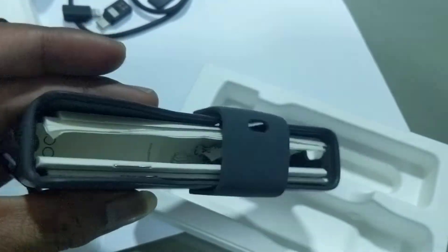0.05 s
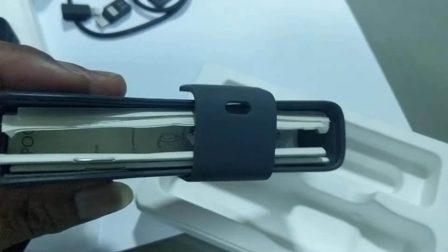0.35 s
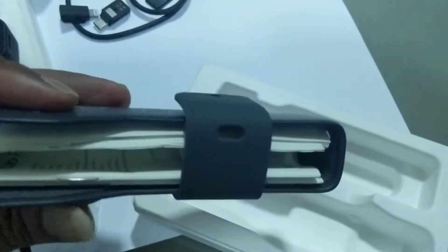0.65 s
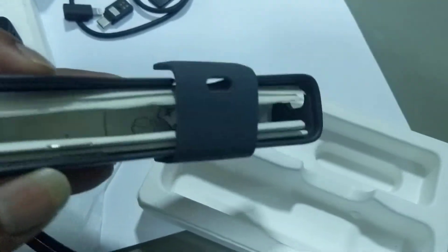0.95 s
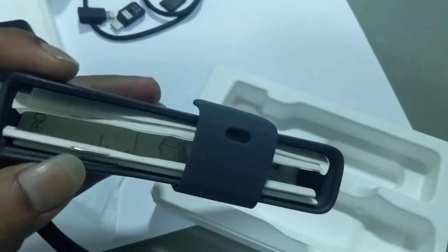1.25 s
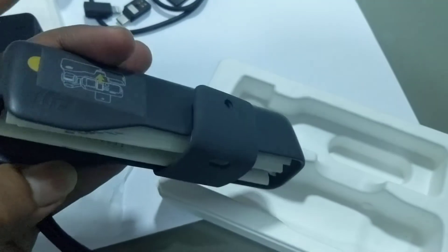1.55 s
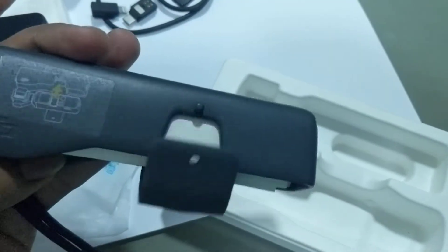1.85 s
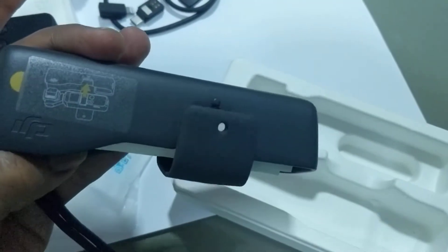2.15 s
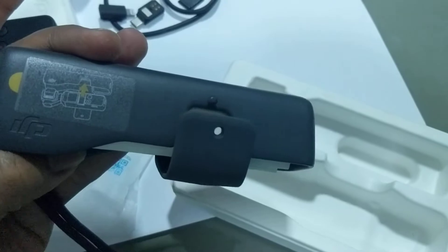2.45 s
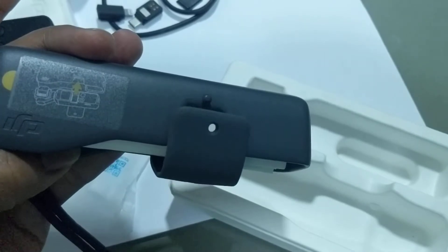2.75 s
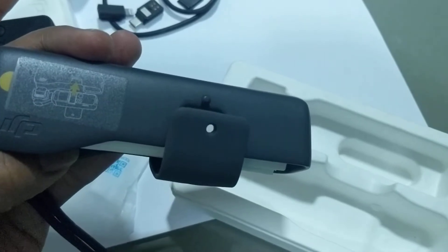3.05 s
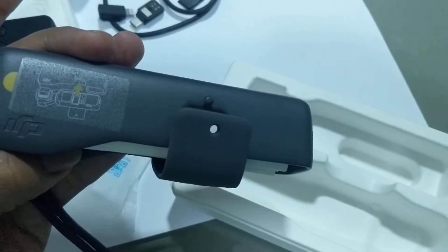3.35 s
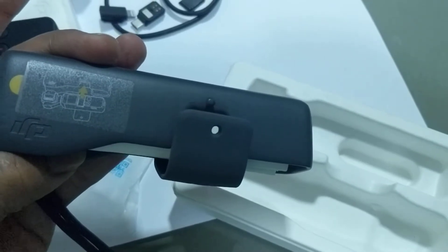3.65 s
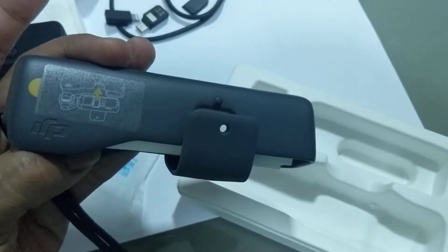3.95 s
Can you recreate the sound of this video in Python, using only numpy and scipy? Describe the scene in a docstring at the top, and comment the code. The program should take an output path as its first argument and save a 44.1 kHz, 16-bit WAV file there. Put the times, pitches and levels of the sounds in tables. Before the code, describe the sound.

One sharp knock on a hard plastic case comes right at the start, close by. Fingers slide faintly over the shell from about 0.3 seconds. Between 0.9 and 2.2 seconds the clasp ticks lightly and irregularly among short scrapes, clearest at 1 second. An electric fan hums with a soft rush of air throughout the small, quiet room, alone until one last tick at 3.9 seconds.

```python
"""A small, quiet room, where a hard plastic case is handled close by.
One sharp knock rings its shell. Fingers then slide over it as it is turned, their tiny slips
exciting the plastic, and the clasp ticks and scrapes open; one last tick comes near the end.
Behind it an electric fan hums on the mains, with wavering tones and a soft rush of air."""
import sys
import numpy as np
from scipy import signal
from scipy.fft import rfft, irfft
from scipy.io import wavfile

SR = 44100
rng = np.random.default_rng(int(sys.argv[2]) if len(sys.argv) > 2 else 0)


def digitize_waveform(pressure):
    """Quantize a signal to 16-bit integers and store it at the path in sys.argv[1].

    Rows of a 2-D input are taken as channels; values are limited to [-1, 1].
    """
    field = np.atleast_2d(pressure).T
    bounded = np.clip(field, -1, 1)
    quanta = np.round(bounded * 32767).astype(np.int16)
    wavfile.write(sys.argv[1], SR, quanta)


N = 176400
T = np.arange(N) / SR
BINS = np.arange(N // 2 + 1) * SR / N  # Hz


def amp(db):
    """Decibels to gain."""
    return 10 ** (np.asarray(db) / 20)


def unit(x):
    """Scale to an rms of one."""
    return x / np.sqrt(np.mean(x ** 2))


def curve(points, hz):
    """Read (Hz, value) points on a log-frequency axis."""
    freqs, values = np.array(points).T
    return np.interp(np.log(hz + 1e-9), np.log(freqs), values)


def shape(x, gain):
    """Filter by a gain for each frequency."""
    return irfft(rfft(x) * gain, N)


def resonance(hz, width_hz):
    """Response of one resonance, gain one at its centre."""
    return 1j * BINS * width_hz / (hz ** 2 - BINS ** 2 + 1j * BINS * width_hz)


def ripple(spacing_hz):
    """Random peaks and dips over frequency from many overlapping resonances; spread near one."""
    steps = np.arange(2 ** 11)
    return np.interp(BINS, spacing_hz * steps, rng.standard_normal(len(steps)))


def walk(rate_hz):
    """Smooth random motion with a spread of one."""
    return unit(shape(rng.standard_normal(N), np.exp(-(BINS / rate_hz) ** 2)))


def fade(t, t60):
    """Exponential decay, 60 dB down after t60 seconds."""
    return np.exp(-np.log(1000) * t / t60)


def add(out, start_s, x):
    """Mix a short sound in at its time."""
    i = max(int(start_s * SR), 0)
    out[i:i + len(x)] += x[:max(N - i, 0)]


def room(x):
    """Diffuse reflections: the mids die first, while the bass and the very top linger."""
    # decay of the room: frequency_hz, t60_s
    decay = [(200, 1.4), (1000, 0.33), (2000, 0.55), (5000, 0.55), (12000, 1.45)]
    # colour of the reflections: frequency_hz, gain_db
    colour = [(200, -36), (600, 13), (1100, 5.5), (1700, 7), (2600, 5.5), (5000, 8), (12000, 4)]
    tail, noise = np.zeros(N), rng.standard_normal(N)
    octave = np.log2(np.clip(BINS, 2 ** 7, 2 ** 14))
    for k in range(7, 15):
        band = shape(noise, np.maximum(1 - abs(octave - k), 0))
        tail += band * fade(T, curve(decay, 2 ** k))
    tail *= T > .005  # pre-delay, s
    tail = shape(tail / np.linalg.norm(tail), amp(curve(colour, BINS)))
    return signal.fftconvolve(x, tail[:SR])[:N]


def fan():
    """The motor hums on the mains, among wavering tones and a soft rush of air."""
    # motor hum: harmonic_number, level_db
    harmonics = [(1, -36), (2, -44.5), (3, -46), (4, -59.5), (5, -63.5)]
    # wavering tones, each noise sent twice through a resonance: pitch_hz, level_db, half_width_hz
    bands = [(59, -53.5, 4.3), (142.9, -52.5, 6.6), (221.6, -58, 1.7), (260.6, -49.5, 2.85),
             (346.4, -65, 6), (351.4, -59, 3.7), (431.5, -68, 15), (482, -65.5, 19), (535, -67, 4.6),
             (653, -71.5, 20), (760, -68, 4.2), (802, -65, 9.9), (869.6, -62, 15.5), (921.6, -65.5, 13),
             (1690, -74.5, 270)]
    # rush of air and hiss: frequency_hz, density_db (power in a 1 Hz band)
    air_spectrum = [(20, -98), (35, -72), (55, -79), (120, -68), (190, -71.5), (300, -74), (420, -77.5),
                    (600, -84.5), (850, -86.5), (1100, -85), (1400, -94), (1800, -95.5), (2500, -100),
                    (3100, -100), (3500, -102), (3900, -100), (4700, -102), (5250, -99), (6000, -103),
                    (7600, -104), (8900, -110), (12000, -112), (16000, -113)]
    hum_hz, waver_db, ripple_db, flicker_db = 100.1, -0.15, 2.5, 0.7
    phase = 2 * np.pi * hum_hz * T + 0.012 * walk(3.1)
    hum = np.zeros(N)
    for harmonic, db in harmonics:
        peak = np.sqrt(2) * amp(db + waver_db * walk(1.5))
        hum += peak * np.sin(harmonic * phase + 2 * np.pi * rng.random())
    tones = sum(amp(db) * unit(shape(rng.standard_normal(N), resonance(hz, 2 * half_width) ** 2))
                for hz, db, half_width in bands)
    noise = rng.standard_normal(N) * np.sqrt(SR / 2)  # unit power per Hz
    air = shape(noise, amp(curve(air_spectrum, BINS) + ripple_db * ripple(spacing_hz=29.8)))
    return hum + tones + air * amp(flicker_db * walk(2))


def slides():
    """Tiny slips under an uneven grip excite the plastic; two rings stand out at each spot rubbed."""
    # skin and clasp sliding over the shell: start_s, rise_s, hold_s, release_s, level_db,
    # hold_change_db, low_ring_hz, low_ring_db, high_ring_hz, high_ring_db, tilt_db_per_octave
    strokes = [(.008, 0.001, 0.043, 0.024, -39, -7, 2820, -4, 4820, -7, -1.3),
               (0.334, .007, .003, 0.011, -55.5, -2, 7600, -3, 9000, -10, 3),
               (0.32, 0.16, 0.076, 0.33, -57.5, -8, 5100, -25, 7000, -16, 1),
               (0.687, .05, 0.029, 0.05, -65.5, 1, 5430, -17, 7400, -19, 3),
               (0.884, .03, 0.018, .05, -57.5, -7, 1890, -1, 2500, -8, -5),
               (1.048, 0.016, 0.041, 0.0068, -47.5, 0.5, 1160, -7, 5400, -8.5, -0.7),
               (1.139, .004, 0.1, 0.1, -44, -14, 840, -11, 4560, -4, -2.3),
               (1.335, .012, .01, 0.05, -56.5, -3, 7860, -16, 11500, -14, 3),
               (1.448, 0.025, 0.1, .014, -47.5, -1, 3100, -1.5, 7160, -16, -1.5),
               (1.707, 0.0075, 0.065, 0.028, -52.5, -4, 1790, -5, 6770, -6.5, -0.5),
               (1.796, 0.043, 0.02, 0.073, -48, -2.5, 1930, -4, 4250, -10, -0.2)]
    # colour of the rubbing before each stroke's tilt: frequency_hz, gain_db
    colour = [(300, 6), (800, -5.5), (1300, -1.5), (2000, 2), (3700, -4), (5600, -4.5), (6800, -3.5),
              (8300, -2.5), (10000, -9), (11500, -13), (16000, -17)]
    slips_per_s, slip_spread_db, skin_hiss_db = 2200, 2, -7.5
    ring_width_hz, grip_db = 280, 0.5
    octaves = np.log2(np.maximum(BINS, 800))  # the tilt acts above 800 Hz
    out = np.zeros(N)
    for start, rise, hold, release, db, change_db, low_hz, low_db, high_hz, high_db, tilt in strokes:
        slips = (rng.random(N) < slips_per_s / SR) * rng.choice([-1, 1], N)
        strength = amp(slip_spread_db * np.minimum(rng.exponential(size=N), 5))
        friction = unit(slips * strength) + amp(skin_hiss_db) * rng.standard_normal(N)
        body_db = curve(colour, BINS) + ripple(spacing_hz=193.6) + tilt * octaves
        body = unit(shape(friction, amp(body_db)))
        rings = sum(amp(ring_db) * unit(shape(friction, resonance(hz, ring_width_hz)))
                    for hz, ring_db in ((low_hz, low_db), (high_hz, high_db)))
        t = T - start
        attack = np.clip(t / rise, 0, 1)
        sustain = amp(change_db * np.clip((t - rise) / hold, 0, 1))
        let_go = np.exp(-2 * np.maximum(t - rise - hold, 0) / release)
        out += amp(db) * attack * sustain * let_go * unit(body + rings)
    return out * amp(grip_db * walk(rate_hz=70))


def strike(modes, contact_ms, chatter_db):
    """A smooth push and a brief bright chatter of the touching surfaces set the modes ringing."""
    chatter_s, chatter_band_hz = 0.00093, [3320, 10500]
    t = T[:SR // 10]
    ring = sum(amp(db) * np.cos(2 * np.pi * hz * t) * fade(t, t60) for hz, db, t60 in modes)
    push = t ** 2 * np.exp(-t * 1000 / contact_ms)
    burst = rng.standard_normal(len(t)) * t * np.exp(-t / chatter_s)
    band = signal.butter(2, chatter_band_hz, "band", fs=SR, output="sos")
    chatter = signal.sosfilt(band, burst / np.linalg.norm(burst))
    force = push / push.sum() + amp(chatter_db) * chatter
    return signal.fftconvolve(ring, force)


def clasp_ticks():
    """The clasp taps the shell; the grip shifts its pitch."""
    # light taps of the clasp: start_s, level_db, pitch_ratio, chatter_db
    taps = [(0.9104, -41, 0.89, -12), (1.0108, -31, 1.05, -5), (1.0146, -31, 0.9, -13), (1.091, -41, 1, 4),
            (1.094, -44, 0.92, 7), (1.108, -50, 1.4, 8), (1.1422, -41, .92, 6.5), (1.492, -46.5, 1.1, 10),
            (1.5612, -38.5, 1.33, 3), (1.639, -45, 1.5, -8), (1.7173, -36.5, 1.04, -12),
            (1.8774, -44, 1.33, 4), (1.892, -43.5, 1.27, 1.5), (1.9272, -38, 1.02, -13),
            (2.211, -45.5, 0.95, -8), (3.9207, -32.5, 1.08, -11.5)]
    # ring of the clasp at a pitch ratio of one: pitch_hz, gain_db, t60_s
    clasp_modes = [(1630, -2.5, 0.021), (1900, -3.5, 0.014), (2360, -8, 0.016), (3900, -10, .012),
                   (5270, -12, 0.026), (6450, -12, 0.025), (7450, -22, 0.017), (8500, -16, .01)]
    out = np.zeros(N)
    for start, db, ratio, chatter_db in taps:
        modes = [(hz * ratio, gain_db, t60) for hz, gain_db, t60 in clasp_modes]
        add(out, start, amp(db) * strike(modes, contact_ms=0.041, chatter_db=chatter_db))
    return out


def knock():
    """The shell is struck and touches again at once, lightly."""
    # the hit and its rebound: start_s, level_db, contact_ms, chatter_db
    hits = [(.0420, -7, 0.06, -22), (0.0447, -31.5, 0.076, 4)]
    # ring of the plastic shell: pitch_hz, gain_db, t60_s
    shell_modes = [(560, -13, 0.027), (1000, -6, 0.017), (1620, 1.5, 0.0079), (1890, -4, 0.0017),
                   (2490, -9, 0.011), (2960, -25, 0.017), (5000, -33, 0.016), (6200, -25, .014),
                   (7400, -19, .014), (9960, -18, .01)]
    out = np.zeros(N)
    for start, db, contact_ms, chatter_db in hits:
        add(out, start, amp(db) * strike(shell_modes, contact_ms, chatter_db))
    return out


def scene():
    """The case close by, its reflections, and the fan behind."""
    hit, ticks, rub = knock(), clasp_ticks(), slides()
    reflections = room(amp(-16) * hit + amp(-17) * ticks + amp(-11.5) * rub)  # reverb sends, dB
    return (hit + ticks + rub + reflections + fan())[None]


def record(dry):
    """A gentle low cut thins the deepest bass; a steep high cut takes off the very top."""
    low_cut_hz, high_cut_hz = 78.5, 15800
    thinned = signal.sosfilt(signal.butter(2, low_cut_hz, "high", fs=SR, output="sos"), dry)
    return signal.sosfilt(signal.ellip(10, .1, 80, high_cut_hz, fs=SR, output="sos"), thinned)


dry = scene()
out = record(dry)
digitize_waveform(out)
```